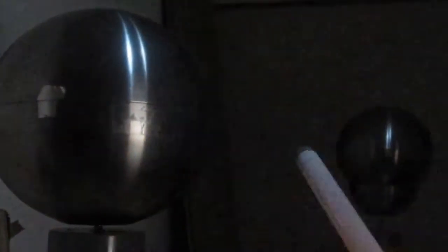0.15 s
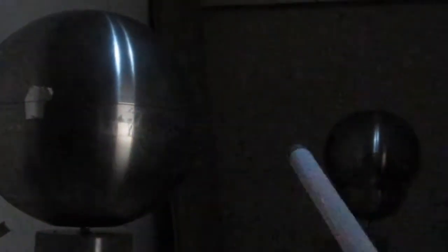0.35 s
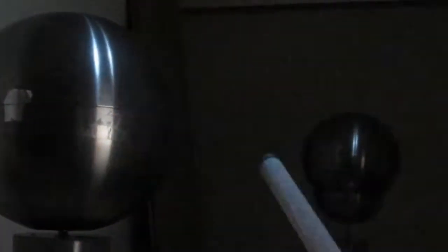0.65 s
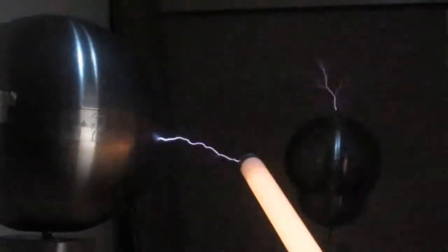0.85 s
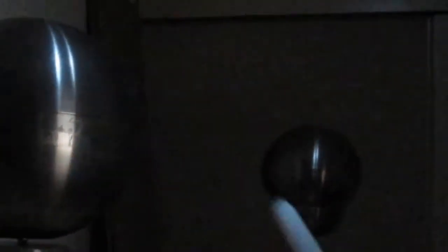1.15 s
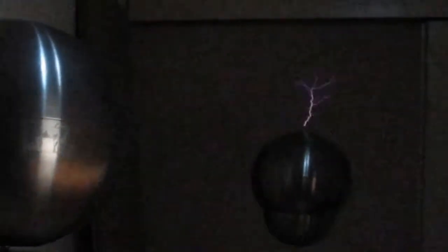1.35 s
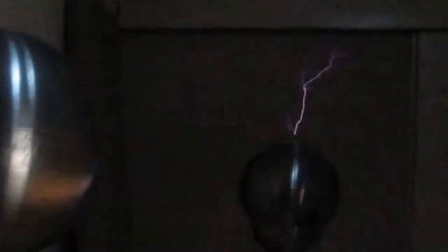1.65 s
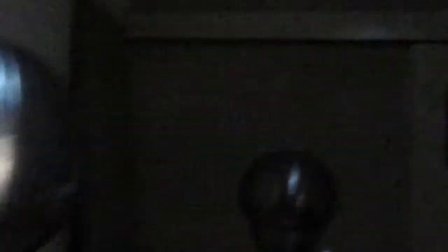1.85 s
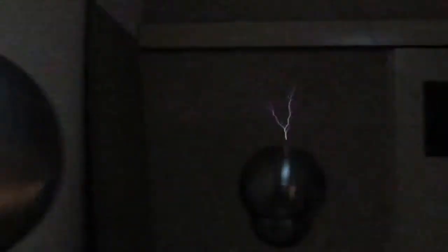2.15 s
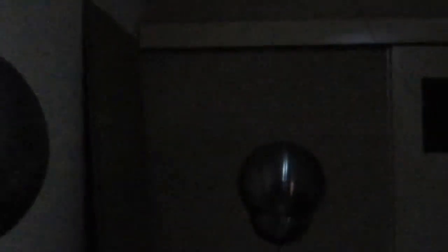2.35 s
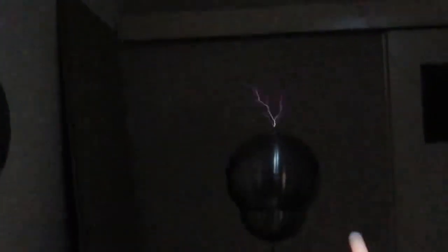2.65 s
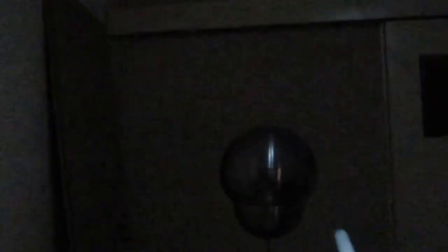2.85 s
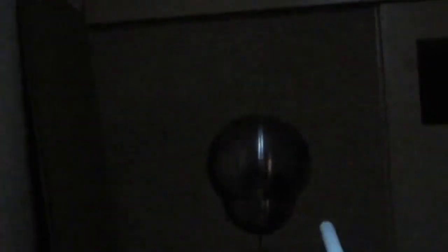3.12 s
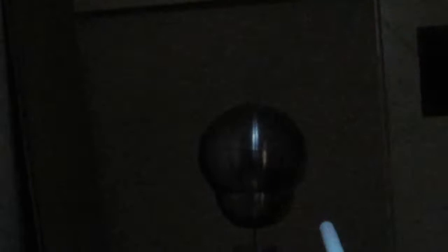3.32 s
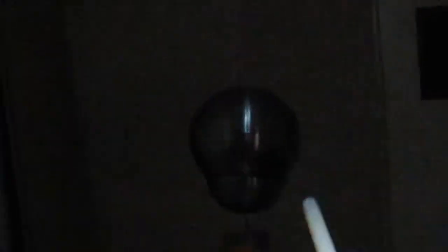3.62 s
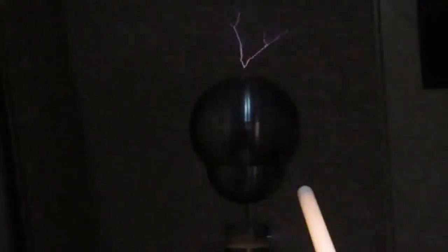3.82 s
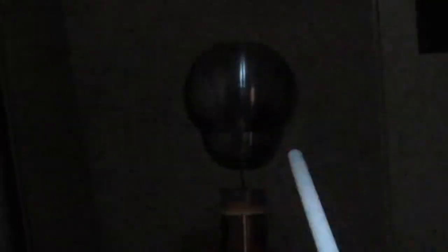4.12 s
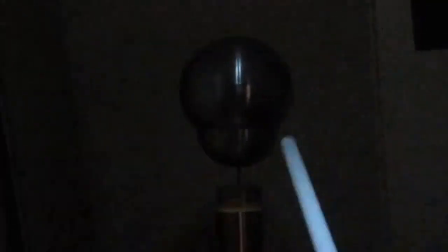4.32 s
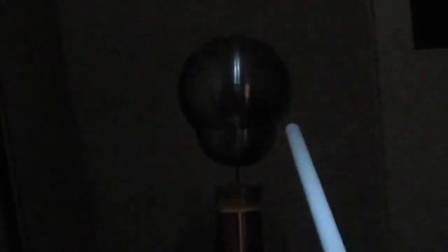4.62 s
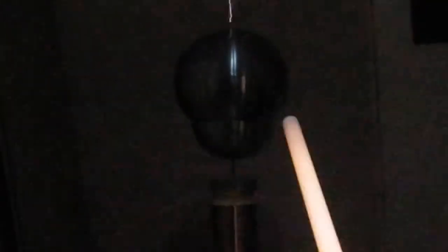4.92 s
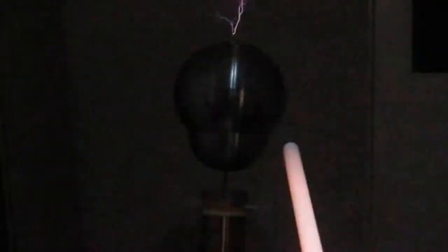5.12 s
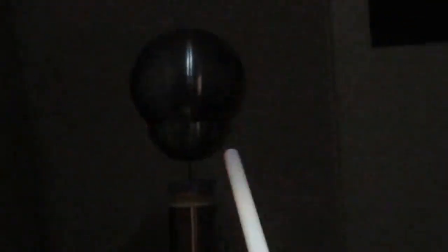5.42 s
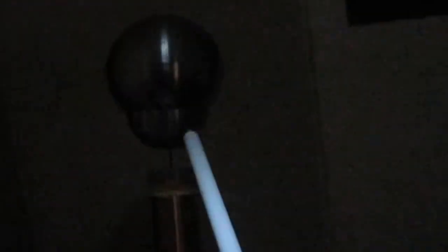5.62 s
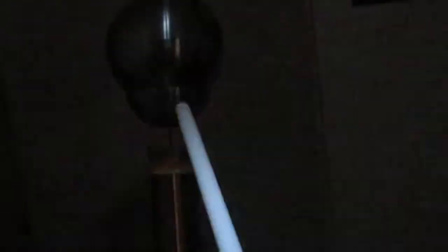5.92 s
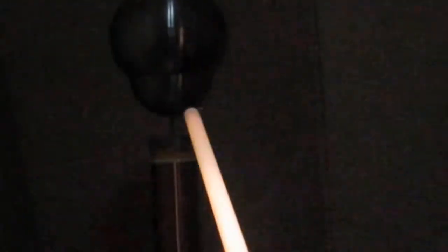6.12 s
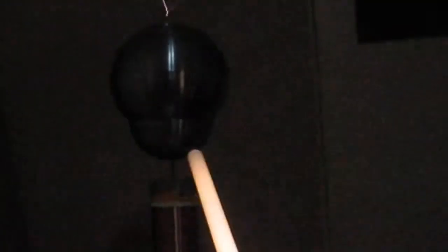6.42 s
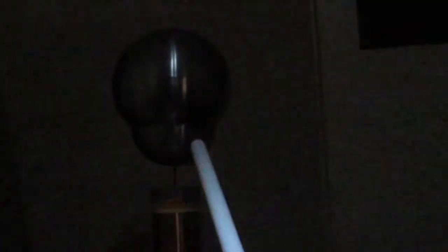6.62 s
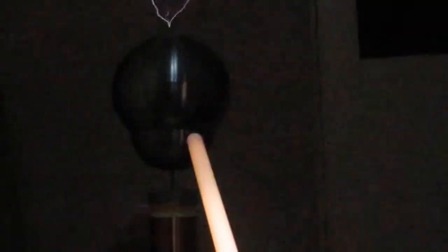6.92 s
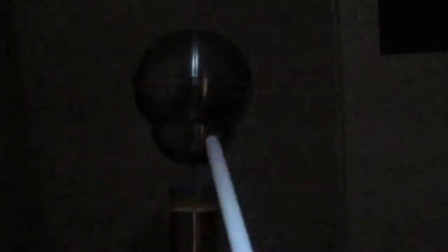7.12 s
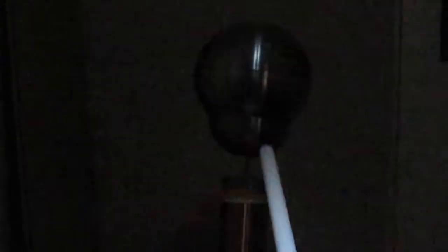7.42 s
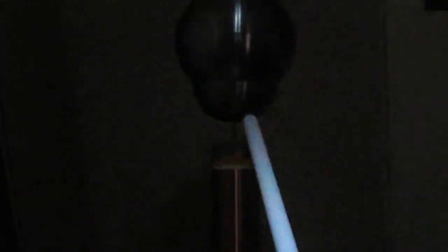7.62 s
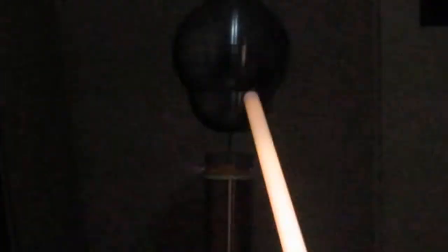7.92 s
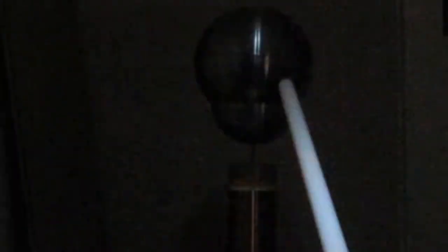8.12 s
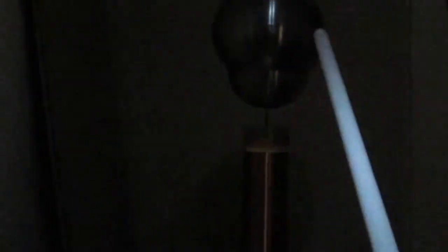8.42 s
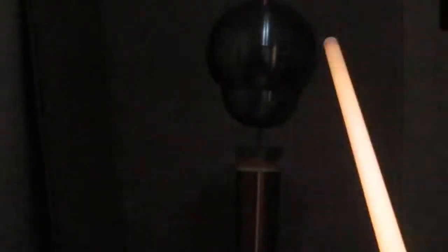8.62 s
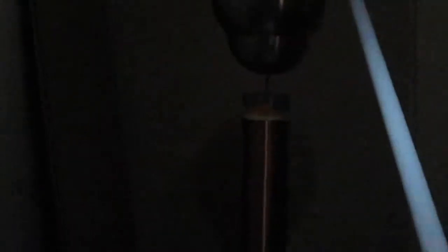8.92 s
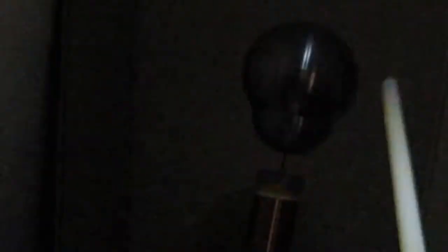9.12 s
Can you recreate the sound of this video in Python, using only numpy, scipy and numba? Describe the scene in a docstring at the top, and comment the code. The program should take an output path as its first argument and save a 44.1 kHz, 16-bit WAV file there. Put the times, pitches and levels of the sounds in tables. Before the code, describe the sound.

A high-voltage coil fires loud, quick bangs and snaps without pause, a harsh crackle ringing off hard indoor walls.

```python
"""A sharp electric bang, then a harsh buzz of sparks: a high-voltage machine in a hard-walled room,
close to a hand-held microphone. It charges on a beat of about 22 a second: a bang, often weaker snaps
on the next beats, then a missed beat or two that store up the next bang. Each spark is a shock wave
with echoes off nearby surfaces. The room's long tail joins them over a dull, steady rush,
and the recorder ducks and rounds the bangs."""
import sys
import numpy as np
from scipy import signal
from scipy.fft import rfft, irfft
from scipy.io import wavfile
from numba import njit

SR = 44100
rng = np.random.default_rng(int(sys.argv[2]) if len(sys.argv) > 2 else 0)


def bounce(signal):
    """Save signal as a 16-bit WAV file at the path given by the first command-line argument."""
    frames = np.transpose(np.atleast_2d(signal))
    limited = np.clip(frames, -1, 1)
    pcm = np.round(limited * 32767).astype(np.int16)
    wavfile.write(sys.argv[1], SR, pcm)


N = 408366

# The bangs, mostly on every third beat: start_s, level_db, thump_db, snap_count
BANGS = [(.0011, 0, -31, 1), (0.1375, 1.2, -14, 0), (.275, 3, -12, 1), (0.4155, 0.5, -21, 4),
         (0.6858, 0.5, -17, 0), (0.8241, 4, -22, 1), (.9621, 1.5, -22, 1), (1.104, -0.5, -36, 0),
         (1.1952, 1.5, -15, 1), (1.3345, 1.6, -36, 2), (1.4725, -2, -23, 2), (1.6532, .2, -21, 4),
         (1.928, 0.2, -26, 1), (2.0648, 2, -27, 0), (2.1585, 2, -16, 2), (2.3397, 1, -22, 1),
         (2.4771, 2.5, -29, 1), (2.6138, 2.5, -37, 1), (2.7071, -0.5, -36, 4), (2.9792, 1.5, -18, 2),
         (3.1611, 1.3, -18, 0), (3.2544, 1.5, -19, 1), (3.3903, 2.5, -23, 1), (3.57, 5, -12, 6),
         (3.9322, 2.5, -21, 2), (4.113, 0.5, -27, 1), (4.2486, 0.5, -16, 1), (4.3827, .5, -36, 1),
         (4.5187, 1, -36, 1), (4.6528, 2, -29, 1), (4.7879, 1.5, -17, 1), (4.9229, 2, -29, 0),
         (5.0563, 4, -14, 0), (5.1486, 1, -18, 1), (5.2812, 0.5, -24, 1), (5.4158, 2, -26, 1),
         (5.5475, 0.5, -43, 1), (5.725, 2.5, -7, 0), (5.8594, 4.5, -11, 0), (5.9936, 0.5, -37, 1),
         (6.126, 0.5, -20, 0), (6.2596, 3, -14, 0), (6.3923, 4.5, -15, 1), (6.5252, 2.5, -19, 1),
         (6.6574, 1.5, -28, 1), (6.7903, 1.5, -21, 1), (6.9224, 1, -12, 1), (7.0552, 2.3, -20, 1),
         (7.1864, 0.2, -36, 2), (7.3236, -2.5, -36, 0), (7.4081, 1, -15, 1), (7.54, 1.5, -18, 1),
         (7.6724, 2, -15, 1), (7.8029, -0.3, -28, 1), (7.9338, 0.5, -33, 2), (8.1096, 0.5, -34, 0),
         (8.1984, 1, -33, 1), (8.329, 1, -39, 1), (8.461, 1.5, -23, 1), (8.5916, 1, -14, 1),
         (8.7648, 4.5, -9, 0), (8.8959, 3, -11, 0), (9.0256, 2, -7, 0), (9.1143, -1, -36, 1),
         (9.245, 1, -31, 0)]
# Tone of the shock wave, common to every path: frequency_hz, gain_db
SHOCK_COLOUR = [(40, 21), (150, -10), (300, -4.5), (500, 3), (1000, 8), (1800, 3.5), (2900, 3), (3600, 4.5),
                (4500, 3), (6000, 3.5), (10000, 3), (15000, 2)]
# The straight path to the microphone, which keeps the sharp edge: frequency_hz, gain_db
DIRECT_COLOUR = [(100, -7), (1000, -2), (4000, -0.5), (9000, -1), (14000, -1.5)]
# Echoes off near surfaces, before and after JUMP_S; they drift as the microphone moves:
# delay_before_ms, delay_after_ms, drift_ms_per_s, level_db
NEAR_ECHOES = [(3.9, 1.8, 0.06, -3), (4.8, 3.95, 0.01, -9.5), (5.4, 4.45, -0.01, -5),
               (7.4, 7.2, 0.13, -6.5)]
# Tone of one bounce off a hard surface: frequency_hz, gain_db
BOUNCE_COLOUR = [(300, -0.5), (2000, -0.5), (5000, -0.46), (12000, 0)]
# Tone of the scatter from nearby clutter: frequency_hz, gain_db
CLUTTER_COLOUR = [(300, -1.5), (1000, 0), (3000, 3.5), (8000, 5), (15000, 5.6)]
# Tone of the room's tail: frequency_hz, gain_db
TAIL_COLOUR = [(100, 0.5), (250, 0.5), (500, 1), (900, -1.5), (1350, 1), (1800, 1.5), (3600, 3.5),
               (6000, 3.5), (10000, 4), (15000, 8)]
# Time the tail takes to fall by 60 dB: frequency_hz, decay_s
TAIL_DECAY = [(100, 0.83), (500, 2.3), (1500, 3.53), (3500, 3.4), (7000, 2.03), (11000, 1.05),
              (16000, 0.23)]
# Standing waves along the microphone's path; the lift, negative at a node, is scaled by depth and
# nearness: pitch_hz, width_hz, lift_db, nearest_s
STANDING_WAVES = [(322, 30, 8, 7), (382, 22, 3, 6), (420, 24, -5, 4), (455, 16, 5, 3), (497, 14, 4, 6),
                  (592, 12, 5, 5), (615, 10, 5, 6), (636, 16, -6, 5), (658, 14, 5, 1.5), (745, 22, 7, 6),
                  (778, 20, -6, 3.5), (846, 22, 5, 7), (912, 24, 5, 7), (962, 36, -8, 1),
                  (1028, 22, 7, 2.6), (1124, 20, 5, 6.5), (1230, 50, -4, 7), (1352, 50, 5, 7),
                  (1595, 40, -3, 6), (1645, 24, 6, .6), (2257, 34, 5, 7.5), (3560, 400, 1.5, 2)]
# Tone of the steady rush in the room: frequency_hz, gain_db
BACKGROUND_COLOUR = [(25, 8), (80, -4), (200, 3.5), (600, 14), (2000, -4.5), (6000, -26), (16000, -51)]

BEAT_HZ, BEAT_RISE_HZ_PER_S = 21.52, 0.16  # the charging beat slowly quickens
BANG_PUSH_MS, SNAP_PUSH_MS, PUSH_SCATTER = 0.095, 0.087, 0.15  # snaps vary by about this share
SNAP_DB, SNAP_SCATTER_DB, SNAP_JITTER_S = -3.5, 1.5, 0.0006
SNAP_THUMP_DB, THUMP_SCATTER_DB = -36.5, 5
JUMP_S = 1.15  # the sparks stop reaching for a hand-held tube and rise into the air


def undb(db):
    """Decibels to gain."""
    return 10 ** (np.asarray(db) / 20)


def at_hz(points, hz):
    """Read a table of frequency_hz, value on a log-frequency axis."""
    frequencies, values = np.transpose(points)
    return np.interp(np.log(np.maximum(hz, 1)), np.log(frequencies), values)


def colour(x, points, size=2048):
    """Minimum-phase filter shaped by a table of frequency_hz, gain_db: nothing rings ahead of a bang."""
    gain = undb(at_hz(points, np.fft.rfftfreq(size, 1 / SR)))
    cepstrum = irfft(np.log(gain))
    cepstrum[1:size // 2] *= 2
    cepstrum[size // 2 + 1:] = 0
    impulse = irfft(np.exp(rfft(cepstrum)))
    return signal.fftconvolve(x, impulse)[:len(x)]


def add(track, start_s, sound):
    """Mix a sound in; what runs past the end comes round to the start, as the machine never stops."""
    track[(int(round(start_s * SR)) + np.arange(len(sound))) % N] += sound


def discharges():
    """The machine fires each bang, then its snaps, one a beat: start_s, level_db, push_ms, thump_db."""
    fired = []
    for start_s, level_db, thump_db, snap_count in BANGS:
        fired.append((start_s, level_db, BANG_PUSH_MS, thump_db))
        beat_s = 1 / (BEAT_HZ + BEAT_RISE_HZ_PER_S * start_s)
        chance = rng.standard_normal((8, 4))
        for beat, (late, strong, long, heavy) in enumerate(chance[:snap_count], 1):
            fired.append((start_s + beat * beat_s + SNAP_JITTER_S * late,
                          SNAP_DB + SNAP_SCATTER_DB * strong,
                          SNAP_PUSH_MS * np.exp(PUSH_SCATTER * long),
                          SNAP_THUMP_DB + THUMP_SCATTER_DB * heavy))
    return fired


def shock(push_ms, crooked=0, spread_ms=0.47, size=256):
    """A steep push and a longer suction; sound from kinks in the spark channel arrives a little later."""
    ms = np.arange(size) * 1000 / SR
    pressure = np.diff(ms * np.exp(-ms / push_ms)) / ms[1]
    channel = crooked * rng.standard_normal(size) * np.exp(-ms / spread_ms)
    channel[0] = 1
    return np.convolve(pressure, channel)


def sparks(fired, leader_db=-20, lead_s=0.0018, stretch_per_db=0.034, wander_ms=0.074):
    """The shocks on three paths: straight to the microphone, off near surfaces and out into the room."""
    direct, echoes, spread = np.zeros((3, N))
    for start_s, level_db, push_ms, _ in fired:
        # summed over all directions, the kinks even out
        add(spread, start_s, undb(level_db) * shock(push_ms, crooked=0))
        # close by, a strong blast pushes for longer
        near_ms = push_ms * np.exp(stretch_per_db * level_db)
        add(direct, start_s, undb(level_db) * shock(near_ms, crooked=0.23, spread_ms=0.62))
        # a thin leader ticks just ahead, loudest before the big bangs
        leader_s = start_s - lead_s * rng.uniform(0.48, 1.4)
        add(direct, leader_s, undb(2 * level_db + leader_db) * shock(push_ms / 2))
        for before_ms, after_ms, drift, echo_db in NEAR_ECHOES:
            delay_ms = before_ms if start_s < JUMP_S else after_ms + drift * (start_s - JUMP_S)
            delay_ms += wander_ms * rng.standard_normal()  # each spark takes its own path
            echo = undb(level_db + echo_db) * shock(near_ms, crooked=0.1, spread_ms=0.89)
            add(echoes, start_s + delay_ms / 1000, echo)
    paths = colour(direct, DIRECT_COLOUR), colour(echoes, BOUNCE_COLOUR), spread
    return [colour(path, SHOCK_COLOUR) for path in paths]


def thumps(fired, rise_s=0.0019, fall_s=0.0022):
    """A short, dull low thump under each spark, heavier under some of the big bangs."""
    out, t = np.zeros(N), np.arange(SR // 20) / SR
    thump = (1 - np.exp(-t / rise_s)) * np.exp(-t / fall_s)
    for start_s, _, _, thump_db in fired:
        add(out, start_s, undb(thump_db) * thump)
    return out


def room_response(tail_spectrum, clutter_spectrum, tail_db=-36, clutter_db=-27,
                  clutter_s=0.023, build_s=0.0014, bands=14):
    """The room from one spot: dense scatter off nearby clutter, then a tail whose top dies first."""
    t = np.arange(SR) / SR
    band_position = np.sqrt(np.linspace(0, 1, SR // 2 + 1)) * (bands - 1)
    tail = 0
    for band in range(bands):
        centre_hz = SR / 2 * (band / (bands - 1)) ** 2
        weight = np.maximum(1 - abs(band_position - band), 0)
        decay = np.exp(-np.log(1000) * t / at_hz(TAIL_DECAY, centre_hz))
        tail = tail + irfft(tail_spectrum * weight) * decay
    clutter = colour(irfft(clutter_spectrum) * np.exp(-t / clutter_s), CLUTTER_COLOUR)
    build_up = 1 - np.exp(-(t / build_s) ** 2)
    return (undb(tail_db) * colour(tail, TAIL_COLOUR) + undb(clutter_db) * clutter) * build_up


def room(shocks, spots=22, steady_hz=2000):
    """Reflections shift as the microphone moves from spot to spot; long waves change most slowly."""
    out, hop = np.zeros(N), N // (spots - 1)
    kept = np.exp(-(np.fft.rfftfreq(SR, 1 / SR) / steady_hz) ** 2)
    pattern = rfft(rng.standard_normal((2, SR)))
    for spot in range(spots):
        fresh = rfft(rng.standard_normal((2, SR)))
        pattern = kept * pattern + np.sqrt(1 - kept ** 2) * fresh
        span = np.arange(max((spot - 1) * hop, 0), min((spot + 1) * hop, N))
        crossfade = np.cos(np.pi / 2 * (span / hop - spot))
        add(out, span[0] / SR, signal.fftconvolve(shocks[span] * crossfade, room_response(*pattern)))
    return out


def standing_waves(sound, depth=0.97, reach_s=4):
    """The room favours some pitches and cancels others, each most as the microphone nears its place."""
    out, t = sound, np.arange(N) / SR
    for pitch_hz, width_hz, lift_db, nearest_s in STANDING_WAVES:
        band = signal.lfilter(*signal.iirpeak(pitch_hz, pitch_hz / width_hz, fs=SR), sound)
        nearness = 1 / (1 + ((t - nearest_s) / reach_s) ** 2)
        out = out + (undb(depth * lift_db * nearness) - 1) * band
    return out


def background(level_db=-40):
    """Room tone: a dull, steady rush under the sparks."""
    rush = colour(rng.standard_normal(N), BACKGROUND_COLOUR)
    return undb(level_db) * rush / np.std(rush)


def scene(direct_db=4, echo_db=3, room_db=2):
    """One microphone close to the sparks, with the room ringing around it."""
    fired = discharges()
    direct, echoes, spread = sparks(fired)
    near = undb(direct_db) * direct + undb(echo_db) * echoes + thumps(fired)
    reverberation = undb(room_db) * standing_waves(room(spread))
    sound = near + reverberation + background()
    return np.array([sound, sound])


@njit
def follow_peaks(rectified, attack, release, level):
    """The recorder's level detector: quick up, slow down."""
    envelope = np.empty(len(rectified))
    for i, sample in enumerate(rectified):
        level += (sample - level) * (attack if sample > level else release)
        envelope[i] = level
    return envelope


def gain_control(x, knee_db=-16, attack_s=0.006, release_s=0.17, slope=0.38):
    """Each bang turns the recorder's gain down; it creeps back while the room dies away."""
    knee = undb(knee_db)
    envelope = follow_peaks(abs(x), 1 / (attack_s * SR), 1 / (release_s * SR), knee)
    return x * np.minimum(knee / (envelope + 1e-9), 1) ** slope


def overload(x, ceiling=0.68):
    """The recorder runs out of headroom and smoothly flattens the tallest peaks."""
    oversampled = signal.resample_poly(x, 2, 1)
    rounded = oversampled / (1 + (oversampled / ceiling) ** 4) ** 0.25
    return signal.resample_poly(rounded, 1, 2)


def record(dry, low_cut_hz=150, top_cut_hz=15900):
    """A hand-held mono recorder: gain control, overload, a gentle low cut and a steep top cut."""
    low_cut = signal.butter(1, low_cut_hz, "high", fs=SR, output="sos")
    top_cut = signal.firwin(255, top_cut_hz, window="blackman", fs=SR)
    sound = overload(gain_control(dry[0]))
    sound = signal.sosfilt(low_cut, sound)
    sound = signal.fftconvolve(sound, top_cut, "same")
    return np.array([sound, sound])


dry = scene()
out = record(dry)
bounce(out)
```